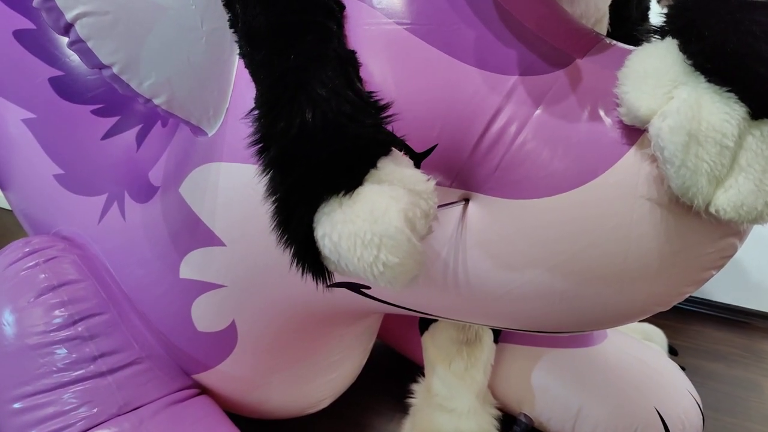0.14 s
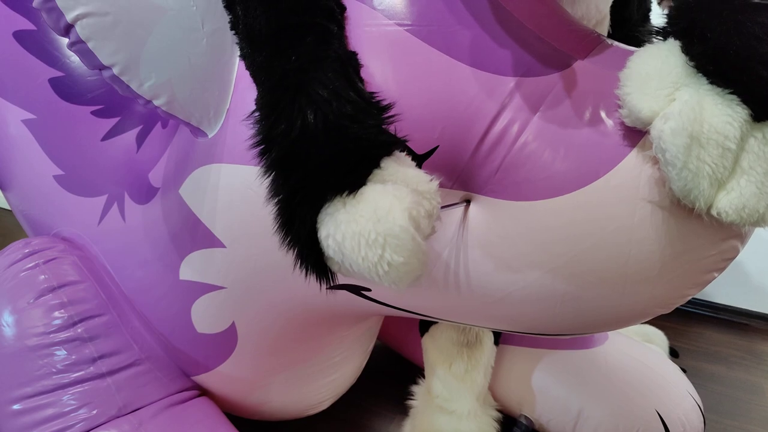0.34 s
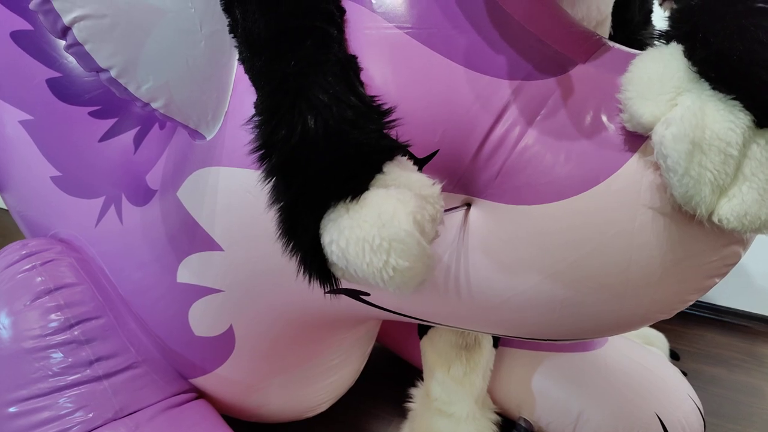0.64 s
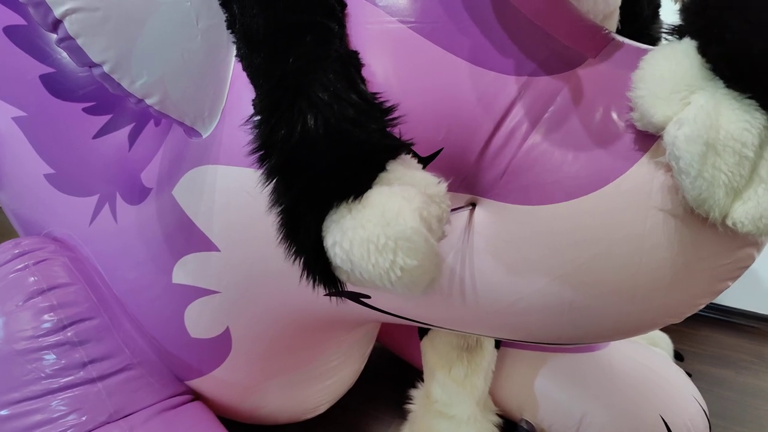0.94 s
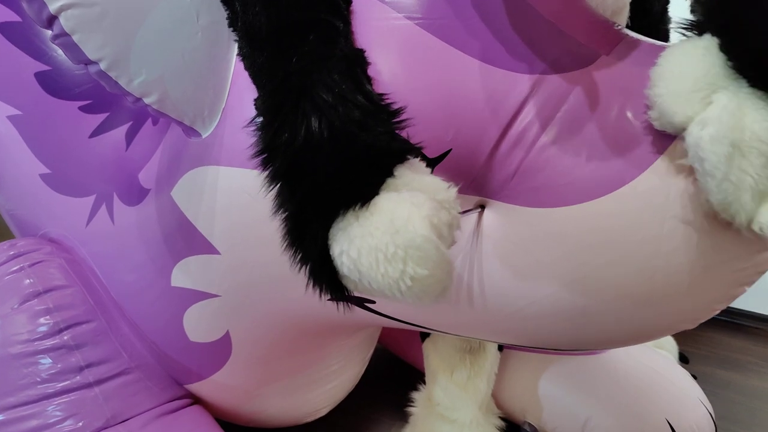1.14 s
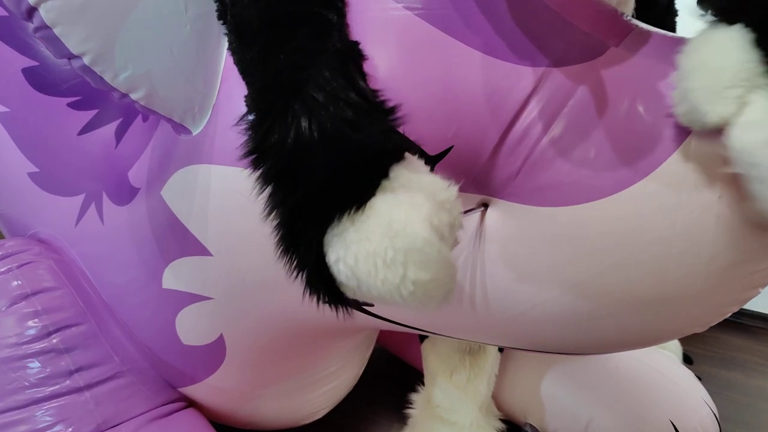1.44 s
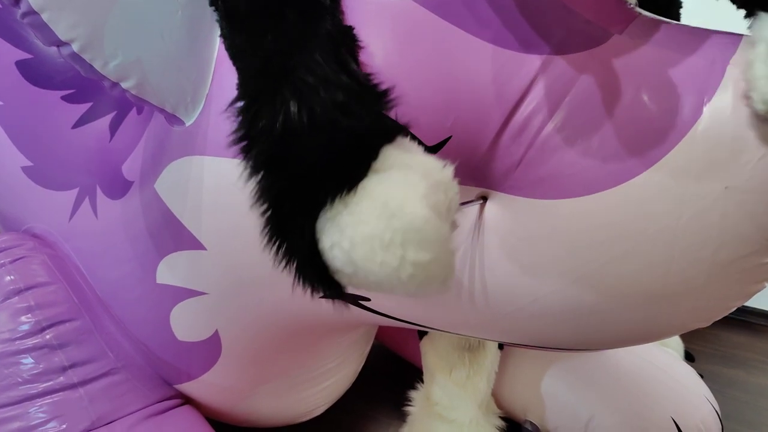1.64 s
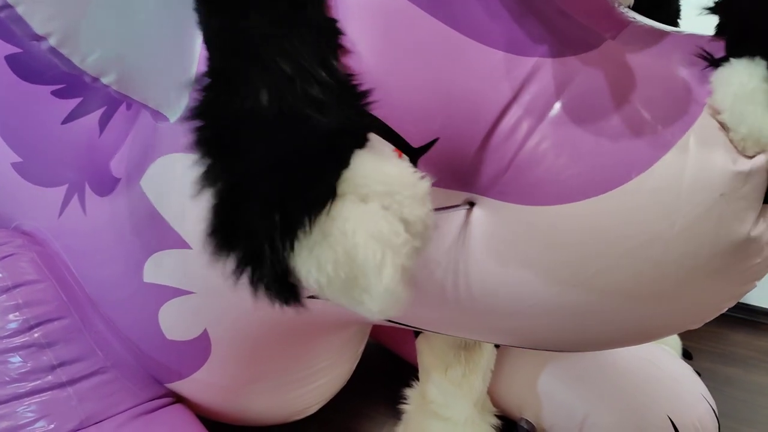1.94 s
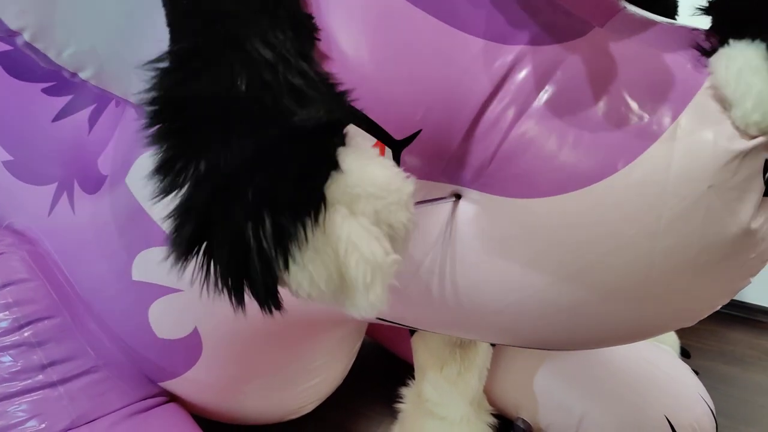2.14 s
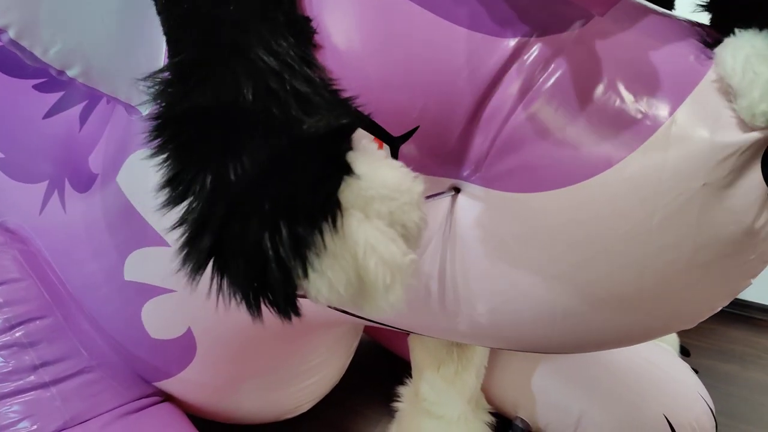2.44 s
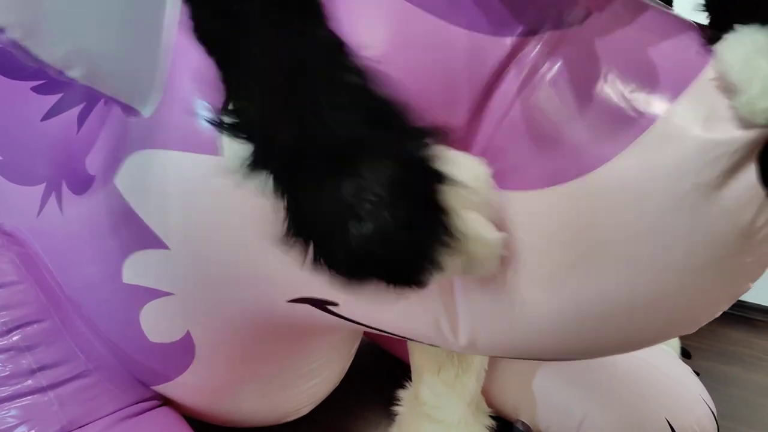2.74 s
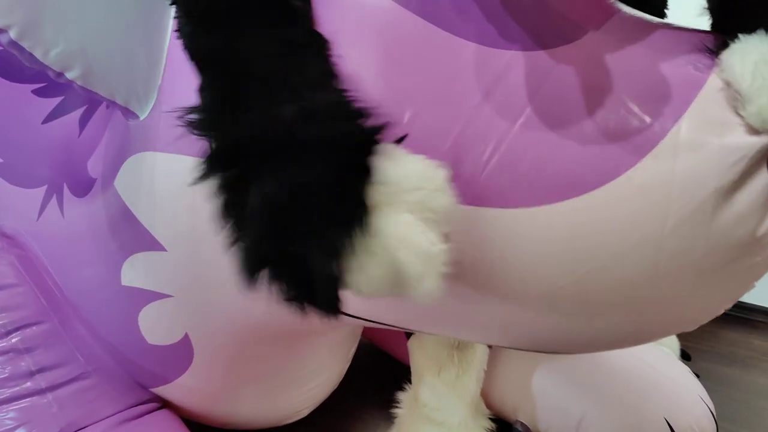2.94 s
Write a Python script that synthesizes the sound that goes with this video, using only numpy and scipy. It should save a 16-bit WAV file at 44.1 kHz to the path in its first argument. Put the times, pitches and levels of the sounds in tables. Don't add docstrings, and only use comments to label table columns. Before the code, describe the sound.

Close up in a quiet room, fur brushes faintly on taut inflated vinyl, the skin popping and thudding softly; a brief rubbery squeal follows, then a far louder booming slap ends it abruptly.

```python
import sys
import numpy as np
from scipy import signal
from scipy.fft import rfft, irfft, next_fast_len
from scipy.io import wavfile
from scipy.ndimage import map_coordinates

SR = 44100
rng = np.random.default_rng(int(sys.argv[2]) if len(sys.argv) > 2 else 0)


def rack_gain(trim_db):
    fader = np.asarray(trim_db, float)
    return 10 ** (fader / 20)


def wav_record(signal):
    frames = np.transpose(np.atleast_2d(signal))
    bounded = np.clip(frames, -1, 1)
    quanta = np.round(bounded * 32767).astype(np.int16)
    wavfile.write(sys.argv[1], SR, quanta)


N = 136710

# (frequency [Hz], level [dB])
RUB_SPECTRUM = [(400, 4), (900, 2.5), (2000, -3), (3500, -10), (7000, -27.5), (14000, -31)]


def unit(x):
    return x / np.sqrt(np.mean(x ** 2) + 1e-20)


def along(points, hz):
    f, v = np.transpose(points)
    return np.interp(np.log(hz + 1), np.log(f + 1), v)


def gain(rows):
    s, db = np.transpose(rows)
    return rack_gain(np.interp(np.arange(N) / SR, s, db, -120, -120))


def wobble(rate_hz):
    knots = rng.standard_normal(int(N * rate_hz / SR) + 4)
    return map_coordinates(knots, [np.arange(N) * rate_hz / SR])


def filtered(x, response):
    m = next_fast_len(x.shape[-1] + 8192)
    return irfft(rfft(x, m) * response(np.fft.rfftfreq(m, 1 / SR)), m)[..., :x.shape[-1]]


def resonant(peaks):
    return lambda f: sum(rack_gain(db) * 1j * f * w / (c * c - f * f + 1j * f * w) for c, w, db in peaks)


def pair(two, spectrum):
    # (frequency [Hz], left-right likeness [0-1])
    likeness = [(60, 0.96), (180, 0.97), (550, 0.63), (1650, 0.022), (5000, 0.05)]

    def mix(hz):
        angle = np.arccos(np.clip(along(likeness, hz), -1, 1)) / 2
        return rack_gain(along(spectrum, hz)) * [np.cos(angle), np.sin(angle)]

    mid, side = filtered(two, mix)
    return unit(np.array([mid + side, mid - side]))


def noise_pair(count=N):
    return rng.standard_normal((2, count))


def gritty(per_s, spread_db, share):
    size = rack_gain(spread_db * rng.exponential(1, N).clip(0, 2))
    hit = (rng.random(N) < per_s / SR) * size
    grains = unit(hit * np.sign(noise_pair()))
    return share * grains + (1 - share) * noise_pair()


def tail(t60s, count):
    hz, t, z = signal.stft(noise_pair(count), SR, nperseg=256)
    z = z * rack_gain(-60 * t / along(t60s, hz)[:, None])
    return signal.istft(z, SR, nperseg=256)[1][:, :count]


def pushes(rows):
    t_s = np.arange(N) / SR
    out = np.zeros(N)
    for s, db, half_width_ms in rows:
        offset = (t_s - s) * 1000 / half_width_ms
        out += rack_gain(db) * np.exp(-np.log(16) * np.minimum(offset ** 2, 99))
    return out


def hush():
    # (frequency [Hz], level [dB])
    hush_spectrum = [(20, -6.5), (150, -20), (500, -42.5), (1100, -32.5), (2300, -91), (6100, -43),
                     (6700, -52), (14500, -54)]
    return rack_gain(-60) * pair(noise_pair(), hush_spectrum)


def room(hits):
    # (frequency [Hz], t60 [s])
    room_t60 = [(100, 0.14), (1000, 0.38), (12000, 0.066)]
    answer = tail(room_t60, SR // 3)
    answer = 0.87 * answer[:1] + 0.26 * answer
    return signal.fftconvolve(hits, answer / np.linalg.norm(answer[0]), axes=1)[:, :N]


def fur():
    # (time [s], level [dB])
    stroke = [(0, -68.5), (.1, -75), (.2, -68.5), (.3, -86), (.6, -77.5), (.99, -82.5), (1.05, -65),
              (1.1, -69.5), (1.26, -67.5), (1.47, -62.5), (1.5, -60), (1.61, -64), (1.67, -73.5),
              (1.94, -71.5), (2.07, -64.5), (2.3, -73.5), (2.83, -84.5), (2.872, -53)]
    # (frequency [Hz], level [dB])
    fur_spectrum = [(40, 22.5), (140, 29.5), (370, 25.5), (960, 15.5), (1500, 6), (4000, 1.5), (7000, -4.5),
                    (14500, -7)]
    # (time [s], scrape level [dB], squeal level [dB], squeal pitch [Hz])
    drag = [
        (1.95, -66, -77, 1750),
        (2.05, -54, -55, 1854),
        (2.12, -55, -61.5, 1910),
        (2.19, -54, -52.5, 1860),
        (2.25, -59, -65, 1820),
        (2.31, -62.5, -59, 1810),
        (2.38, -65, -58, 1820),
        (2.435, -61.5, -60.5, 1713),
        (2.48, -64, -75, 1570),
        (2.62, -96, -104, 1600),
    ]
    hiss = pair(gritty(3500, spread_db=4.5, share=0.4), fur_spectrum)
    hiss = hiss * gain(stroke) * rack_gain(20 + 0.7 * wobble(16) + 1.37 * wobble(60))

    s, scrape_db, squeal_db, hz = np.transpose(drag)
    scrape = pair(gritty(2500, spread_db=-2.0, share=0.28), RUB_SPECTRUM)
    scrape = scrape * rack_gain(7.5 + 2.1 * wobble(25.26))

    squeal_width_hz, waver_hz = 170, 30
    pitch_hz = np.interp(np.arange(N) / SR, s, hz) + waver_hz * wobble(35)
    tone = np.sin(2 * np.pi * np.cumsum(pitch_hz) / SR)
    flutter = np.array([wobble(squeal_width_hz), wobble(squeal_width_hz)])
    squeal = flutter * rack_gain(2 + 1.5 * wobble(24.7)) * tone
    return (hiss + scrape * gain(np.transpose([s, scrape_db]))
            + squeal * gain(np.transpose([s, squeal_db])))


def kneading():
    # (start [s], hold [s], level [dB], release [dB/s])
    scuffs = [(0, 0.03, -44, 148), (0.12, 0.081, -41, 137), (0.289, 0.013, -48, 172),
              (0.499, 0.04, -38, 192), (0.615, 0.1, -40.5, 129), (0.848, 0.019, -52, 150),
              (0.995, 0.042, -36.5, 160), (1.123, 0.038, -42, 84), (1.657, 0.016, -39, 192),
              (1.808, 0.11, -47, 100), (1.932, 0.061, -45, 202), (2.161, 0.029, -30.5, 146),
              (2.381, 0.016, -46, 128), (2.454, 0.058, -45, 140), (2.552, 0.066, -54.5, 122),
              (2.739, 0.056, -48, 106), (2.855, .012, -52, 102), (2.866, 0.01, -49, 304)]
    # (frequency [Hz], level [dB])
    skin_spectrum = [(50, 4), (90, 7.5), (150, 2.5), (360, -3.5), (600, -16.5), (1100, -15), (1500, -30.5),
                     (3500, -36.5), (7000, -100)]
    # (time [s], level [dB])
    sway = [(0, -47), (.3, -51), (.42, -50), (.68, -42), (.8, -41.5), (.93, -49), (1.02, -49), (1.12, -46),
            (1.6, -51), (1.68, -32.5), (1.76, -52), (1.86, -31), (1.98, -42), (2.04, -44), (2.2, -38.5),
            (2.68, -49), (2.873, -46)]
    t_s, rise_s = np.arange(N) / SR, 0.012
    effort = np.zeros(N)
    for s, hold_s, db, fall_db_s in scuffs:
        release_db = fall_db_s * np.maximum(t_s - s - hold_s, 0)
        effort += rack_gain(db - release_db) * np.clip((t_s - s) / rise_s, 0, 1)
    grains = pair(gritty(500, spread_db=0.0, share=0.59), skin_spectrum)
    grains = grains * effort * rack_gain(2.45 * wobble(29.88))
    squeeze = pair(noise_pair(), [(10, -9), (26, 17.0), (50, -12.0), (90, -41.5), (200, -90)])
    return grains + squeeze * gain(sway)


def ticks():
    # (time [s], peak level [dB])
    unstickings = [(0.1256, -42), (.3063, -44), (.5088, -37.5), (.6181, -46.5), (0.7016, -43.5),
                   (.8575, -55), (1.0135, -32.5), (1.035, -41), (1.728, -49), (1.778, -48.5), (1.804, -46),
                   (1.856, -47.5), (1.974, -30), (2.8719, -17), (2.888, -26), (2.9044, -35), (2.9114, -22)]
    # (time [s], peak level [dB])
    spits = [
        (0.545, -50.5),
        (.604, -53),
        (1.251, -44),
        (1.96, -47),
        (2.8721, -17),
        (2.911, -27),
    ]
    # (time [s], level [dB])
    crinkles = [(1.036, -37), (1.047, -40), (1.138, -47), (1.166, -44), (1.337, -49), (1.383, -50),
                (1.432, -47), (1.446, -46), (1.506, -44), (1.533, -43), (1.729, -49), (1.795, -50),
                (1.808, -48), (1.83, -50), (2.889, -22)]
    # (centre [Hz], width [Hz], level [dB])
    tick_modes = [(761, 92, 9.5), (1130, 370, 4.5), (1820, 240, -6.5), (2490, 210, -5), (3150, 130, 1)]
    # (centre [Hz], width [Hz], level [dB])
    crinkle_modes = [(3100, 500, 5), (3900, 700, -3)]
    spit_spectrum = [(1200, -35), (3000, 7), (14000, 4.0)]
    crack_spread_s = 0.00398
    blows, nicks, out = np.zeros(N), np.zeros(N), np.zeros((2, N + SR))
    t_s = np.arange(SR // 4) / SR

    def add_burst(s, db, t60_s, spectrum):
        burst = rack_gain(db - 60 * t_s / t60_s) * pair(noise_pair(len(t_s)), spectrum)
        out[:, round(s * SR):][:, :len(t_s)] += burst

    for s, db in unstickings:
        lag, size = rng.random((2, 3))
        delays = np.round(lag * [0, crack_spread_s, crack_spread_s] * SR).astype(int)
        drop_db = 4.5 * size * [0, 1, 1] + [0, 8, 11]
        blows[round(s * SR) + delays] = -rack_gain(db + 25.0 - drop_db)
        add_burst(s, db - 22.0, 0.43, RUB_SPECTRUM)
    for s, db in spits:
        add_burst(s, db - 4.5, 0.0079, spit_spectrum)
    for s, db in crinkles:
        nicks[round(s * SR)] = rack_gain(db + 13)

    crack = filtered(blows, lambda f: resonant(tick_modes)(f) / (1 + 1j * f / 3600) ** 4)
    crack = crack + filtered(nicks, resonant(crinkle_modes))
    return out[:, :N] + np.array([crack, np.roll(crack, shift=3)])


def skin():
    # (time [s], peak level [dB], half width [ms])
    dents = [(.124, -34.5, 2.2), (.146, -36, 1.4), (.207, -32.5, 1.3), (.307, -50, 3.2), (.638, -32, 2),
             (.673, -22, 1.23), (.732, -31, 2), (.998, -28, 0.96), (1.010, -14.5, 1.32), (1.028, -35, 1.5),
             (1.0353, -29, 1.5), (1.0405, -35, 1.1), (1.044, -31.5, 1.1), (1.054, -29, 2),
             (1.649, -30.5, 1), (1.6597, -25, 1.04), (1.6651, -17, 1.14), (1.682, -24.5, 1.9),
             (1.689, -48, 3.1), (1.7295, -35, 2), (1.7433, -34.5, 1.7), (1.7794, -31.5, 1.8),
             (1.8073, -32.5, 1.6), (1.834, -37, 2.7), (1.8562, -30.5, 1.2), (1.8674, -20, 1.5),
             (1.892, -35, 5), (1.9461, -26.5, 1.26), (1.9763, -24.5, 2.7), (2.149, -28, 1.3),
             (2.2815, -24.5, 1.9), (2.3923, -34, 3.9), (2.4656, -24.5, 2), (2.5633, -46, 3.3),
             (2.7854, -26.5, 2.22), (2.838, -50, 9.6), (2.8764, -10.5, 0.77), (2.880, -11, 2.2),
             (2.9014, -22, 1.1), (2.9102, -13.5, 0.68), (2.921, -9, 0.87), (2.9247, -5.5, 0.81),
             (2.9339, -11.5, 0.55), (2.9525, -7, 1.7), (2.9562, -11, 2.2), (2.970, -24, 0.85)]
    # (time [s], peak level [dB], half width [ms])
    pops = [(.171, -29, 1.45), (.517, -30, 1.23), (.561, -35, 1.4), (.665, -33.5, 1.1), (.691, -33.5, 1.3),
            (.718, -30, 1.6), (1.6805, -31, 1.17), (2.1746, -15, 0.98), (2.184, -23.5, 1.1),
            (2.198, -25, 1.1), (2.2095, -16.5, 0.93), (2.222, -25, 1.05), (2.2361, -29, 1.2),
            (2.5054, -28.5, 0.64), (2.5964, -30, 0.8), (2.697, -36, 0.8), (2.7549, -29.5, 0.71),
            (2.8734, 1, 1.08), (2.892, -11.5, 2.8), (2.904, -3, 2.3), (2.9083, -2, 1.42),
            (2.9118, -14, 0.5), (2.9288, -10, 0.91), (2.9465, -14.5, 0.71), (2.958, -19, 1.7)]
    # (centre [Hz], width [Hz], level [dB])
    chamber_modes = [(59, 37, -23), (247, 185, 3), (573, 150, -34)]
    # (centre [Hz], width [Hz], level [dB])
    fold_modes = [(308, 53, -14), (549, 86, 5), (970, 90, 6.5)]

    def rebound(f):
        delay = np.exp(-2j * np.pi * f * 0.0023)
        return 1 - 2.0 / (1 + 1j * f / 45) * delay + rack_gain(-5.5) * resonant(chamber_modes)(f)

    def fold(f):
        return 1j * f / (60 + 1j * f) + rack_gain(3.5) * resonant(fold_modes)(f)

    return -0.7 * filtered(pushes(dents), rebound) + 0.56 * filtered(pushes(pops), fold)


def slap():
    # (frequency [Hz], level [dB])
    boom_spectrum = [(80, -14), (200, -11), (300, -9), (620, -4.5), (1000, -12.5), (2000, -27.5),
                     (3300, -29), (14500, -51.5)]
    # (frequency [Hz], t60 [s])
    boom_t60 = [(200, 0.78), (800, 0.55), (8000, 0.48)]
    # (frequency [Hz], level [dB], t60 [s])
    body_modes = [(27.33, -10, 0.79), (54.9, -14.5, 0.86), (89, -21, 0.54)]
    # (frequency [Hz], level [dB])
    port_spectrum = [(13000, -40), (13800, -1), (14100, -3), (14400, -7)]
    out, start = np.zeros((2, N)), round(2.873 * SR)
    t_s = np.arange(N - start) / SR
    count = len(t_s)

    rise = 1 - 0.62 * np.exp(-t_s / 0.03)
    lumps = rack_gain(1.1 * wobble(67.3)[:count])
    rattle = 0.71 + 0.35 * abs(gritty(900, spread_db=9, share=0.92)[:, :count])
    boom = tail(boom_t60, count) * rise * lumps * rattle
    out[:, start:] = rack_gain(-25) * pair(boom, boom_spectrum)

    ring = filtered(rng.standard_normal(count), lambda f: rack_gain(along(port_spectrum, f)) * (f > 12000))
    ring_t60_s = 0.34
    out[1, start:] += unit(ring) * rack_gain(-42 - 60 * t_s / ring_t60_s) * (1 + 4 * np.exp(-t_s / 0.0034))

    onset = 1 - np.exp(-t_s / 0.00078)
    for hz, db, t60_s in body_modes:
        out[:, start:] += rack_gain(db - 60 * t_s / t60_s) * np.cos(2 * np.pi * hz * (t_s - 0.034)) * onset
    return out


def scene():
    hits = skin() + ticks()
    return hush() + rack_gain(-5.5) * room(hits) + fur() + kneading() + hits + slap()


def top_cut(x):
    return signal.sosfilt(signal.butter(12, 14680, fs=SR, output="sos"), x)


def record(dry):
    # (frequency [Hz], left over right [dB])
    port_balance = [(500, -1), (1500, -1), (5000, -4), (13000, -3.5), (13700, -23), (14100, -9)]
    top_hz, dip_hz, dip_width_hz, dip = 14330, 7330, 350, 0.53

    def ports(hz):
        balance = rack_gain(along(port_balance, hz) * [[0.6], [-0.4]])
        low_cut = hz / np.hypot(hz, 14)
        high_cut = np.clip((top_hz - hz) / 150 + 0.5, 0, 1) ** 2
        notch = 1 - dip * np.exp(-((hz - dip_hz) / dip_width_hz) ** 2)
        return balance * low_cut * high_cut * notch

    x = filtered(dry, ports)
    x = x / (1 + abs(x / 1.15) ** 4) ** (1 / 4)
    return top_cut(x)


dry = scene()
out = record(dry)
wav_record(out)
```